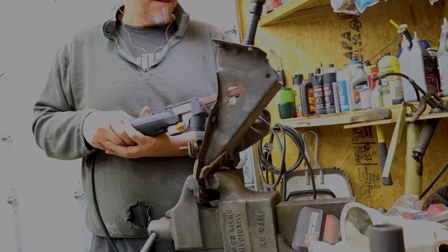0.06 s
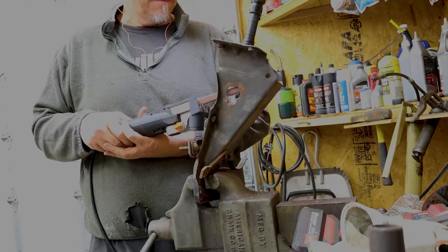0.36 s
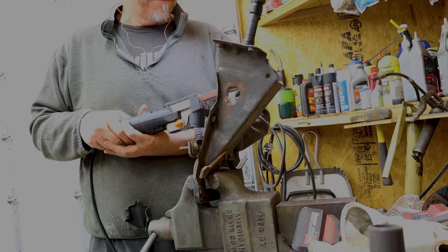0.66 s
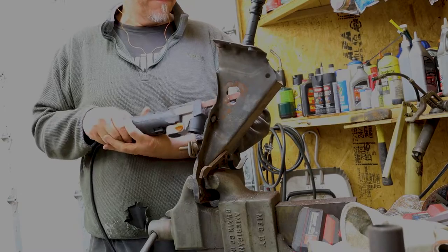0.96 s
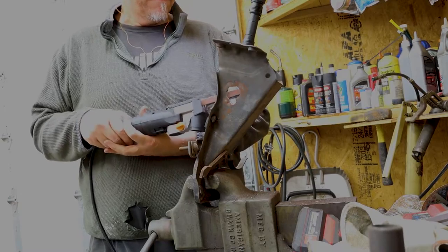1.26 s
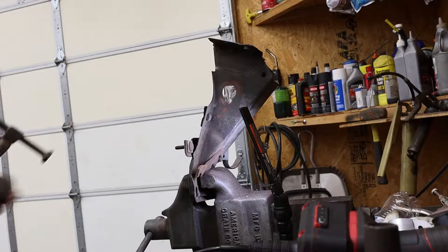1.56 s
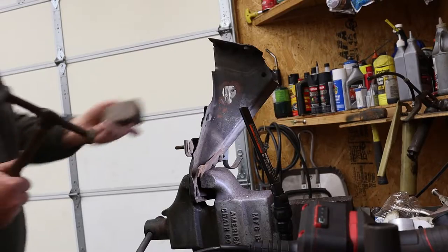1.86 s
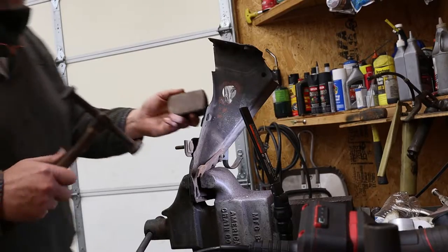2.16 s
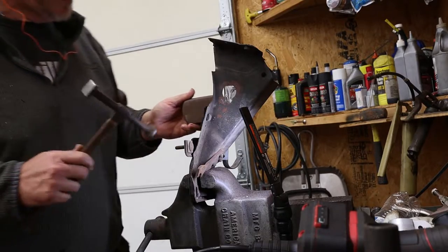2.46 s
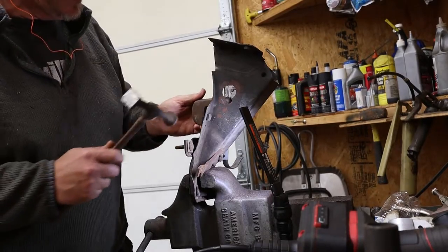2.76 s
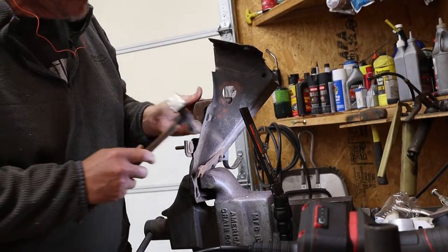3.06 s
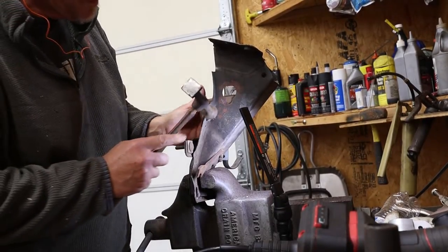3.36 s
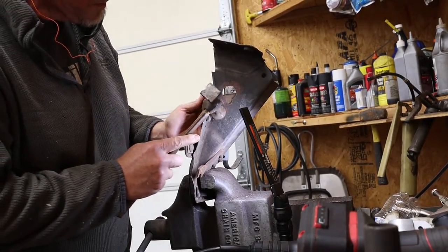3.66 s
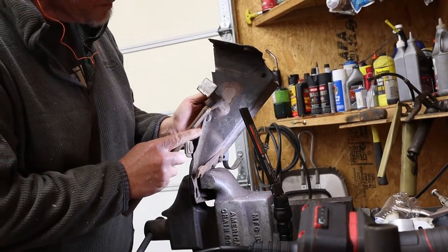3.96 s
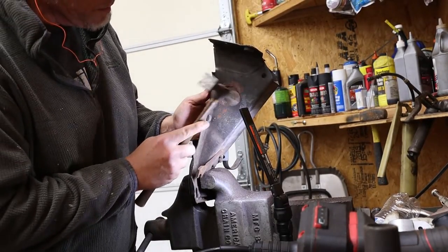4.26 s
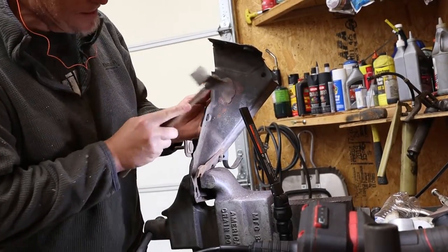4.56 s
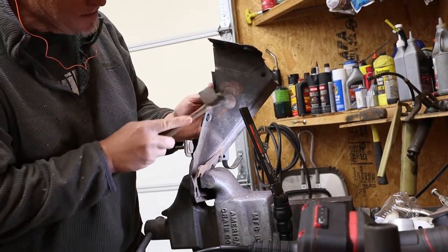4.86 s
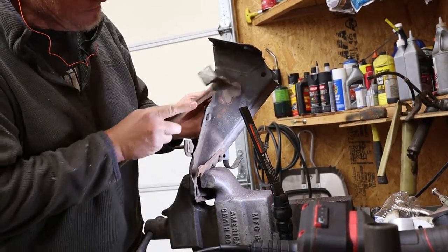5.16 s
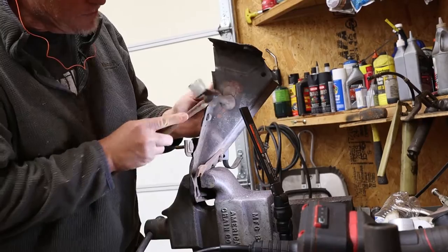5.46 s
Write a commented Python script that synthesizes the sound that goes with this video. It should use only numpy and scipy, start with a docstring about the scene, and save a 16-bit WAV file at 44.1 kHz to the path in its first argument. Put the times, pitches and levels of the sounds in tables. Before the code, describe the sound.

A high grinder whine with uneven, gritty rasps and thin squeals on steel is heard close by in a small workshop. After a sudden cut, sleeves rustle and a steel block and hammer clank several times against a bracket held in a vice, with a short slide of metal on metal. A firm hammer strike leads straight into a rapid stream of tiny, high metallic taps, like hammering played at high speed.

```python
"""Grinding and hammering a steel bracket.

In a workshop a small handheld grinder whines, and its grit rasps and squeals on the weld of a bracket
clamped in a vice. Abruptly the scene changes: a steel block is set against the bracket, and a hammer
is lined up and strikes once, exciting the plate modes. The hammering then runs on at six times its
speed, so that the same bracket and room sound as bright, quick ticks."""
import sys
import numpy as np
from scipy import signal
from scipy.fft import rfft, irfft, next_fast_len
from scipy.io import wavfile

SR = 44100
rng = np.random.default_rng(int(sys.argv[2]) if len(sys.argv) > 2 else 0)


def dump(signal):
    """Clip the signal to [-1, 1] and save it as 16-bit WAV at the path in sys.argv[1]."""
    limited = np.clip(np.atleast_2d(signal).T, -1, 1)
    pcm = np.round(limited * 32767).astype(np.int16)
    wavfile.write(sys.argv[1], SR, pcm)


N = 247842
TIME = np.arange(N) / SR
GRIND_END_S, FAST_START_S, FAST_SPEED = 1.56, 4.363, 6.0

# bending modes of the bracket: f/Hz, level/dB, T60/s
PLATE_MODES = [(340, -19, .3), (378, -19, .3), (505, -11, .17), (550, -11, .2), (790, -5, .15),
               (868, -1, .2), (962, -2, .15), (1030, -6, .13), (1105, -5, .18), (1250, -7, .18),
               (1515, -1, .15), (1567, -4, .17), (1845, 2.5, .17), (1980, -3, .12), (2033, 4, .17),
               (2190, -8, .12), (2320, -9, .16), (2460, -7, .14), (2640, -7, .14), (3060, -11, .13),
               (3420, -13, .13), (3665, -13, .12), (4038, -8, .13), (4380, -14, .11), (6400, -10, .08),
               (7420, -8, .1)]
# modes of bracket and vice swaying as one: f/Hz, level/dB, T60/s
SWAY_MODES = [(35, -27, 1.8), (38, -23, 1.9), (126, -20, .45), (136, -16, .4)]
# impacts of block and hammer: t/s, level/dB, hardness/dB, clatter/dB, T60 factor, sway/dB, favoured f/Hz
IMPACTS = [(1.652, -54, -9, 3, .66, -55, 2000), (2.391, -52.5, 3.5, -2, 0.58, -61, 2000),
           (2.508, -29.5, -2.5, -5.5, 1.27, -27.5, 1140), (2.569, -34, -4.5, -1, 0.41, -23, 1110),
           (3.2453, -30.5, -0.5, 0.5, 0.88, -18.5, 813), (3.875, -28, 2.5, -8, 1.28, -24.5, 2090),
           (4.3266, -20, 9, -3.5, 0.59, -18, 1945)]


def undb(db):
    """Decibels to amplitude ratio."""
    return 10 ** (np.asarray(db) / 20)


def unit(x):
    """Normalise to rms 1."""
    return x / np.sqrt(np.mean(x ** 2) + 1e-18)


def decay(t, t60):
    """Exponential decay by 60 dB in t60."""
    return np.exp(-np.log(1000) * t / t60)


def noise(size=N):
    """Gaussian white noise."""
    return rng.standard_normal(size)


def walk(rate_hz):
    """Interpolated random fluctuation of rms 1."""
    steps = noise(8192)
    return unit(np.interp(TIME * rate_hz, np.arange(len(steps)), steps))


def between(start, end):
    """A gate with 2 ms edges."""
    return np.interp(TIME, [start - .002, start, end, end + .002], [0, 1, 1, 0])


def strokes(rows, attack_s, release_s):
    """Power sum of envelopes that rise, hold and decay; rows are t/s, duration/s, level/dB."""
    power = 0
    for s, length, db in rows:
        early, late = np.maximum(s - TIME, 0), np.maximum(TIME - s - length, 0)
        power = power + (undb(db) * np.exp(-early / attack_s - late / release_s)) ** 2
    return np.sqrt(power)


def filtered(x, response):
    """Multiply the spectrum by a frequency response; rms 1."""
    size = next_fast_len(len(x) + 4096)
    hz = np.maximum(np.arange(size // 2 + 1) * SR / size, 1)
    return unit(irfft(rfft(x, size) * response(hz), size)[:len(x)])


def colour(x, points, speed=1):
    """Impose a spectral envelope, its frequencies scaled by speed."""
    hz, db = np.transpose(points)
    return filtered(x, lambda f: undb(np.interp(np.log(f / speed), np.log(hz), db)))


def resonate(x, modes):
    """Forced response of parallel resonators; modes are f/Hz, bandwidth/Hz, level/dB."""
    return filtered(x, lambda f: sum(undb(db) / (1 + 1j * (f * f - hz * hz) / (f * width))
                                     for hz, width, db in modes))


def below(x, hz):
    """Zero-phase low-pass filter."""
    return signal.sosfiltfilt(signal.butter(4, hz, fs=SR, output="sos"), x, padtype=None)


def add(out, s, x):
    """Superpose x on out from time s."""
    start = int(s * SR)
    out[start:start + len(x)] += x[:max(N - start, 0)]


def workshop(x, wet_db, t60):
    """Reverberation: diffuse reflections from bench and walls follow the direct sound."""
    t = TIME[:SR // 2]
    tail = noise(len(t)) * decay(t, t60) * (t > .004)
    return x + undb(wet_db) * signal.fftconvolve(x, tail / np.linalg.norm(tail))[:N]


def spindle():
    """Judder: dragged to a low speed, the spindle runs unevenly. Returns turns and judder (0 to 1)."""
    # rotation rate: t/s, f/Hz
    rotation = [(0.0, 327.0), (0.06, 339.1), (0.146, 325.6), (0.364, 317.0), (0.52, 320.4), (0.576, 328.7),
                (0.786, 318.6), (0.85, 340.6), (0.928, 330.8), (1.012, 343.6), (1.56, 326.3)]
    judder_hz, transition_hz = 320.6, 4.2
    speed_hz = np.interp(TIME, *np.transpose(rotation))
    judder = 1 / (1 + np.exp((speed_hz - judder_hz) / transition_hz))
    turns = np.cumsum(speed_hz * (1 + .016 * judder * walk(260))) / SR
    return turns, judder


def drive_whine(turns, judder):
    """Rotational orders: tones locked to the spindle speed, the high ones broken up by judder."""
    # tones of the drive: multiple of the rotation rate, level/dB
    orders = [(.69, -24), (1, -5), (1.72, -13), (3.1, -15), (3.76, -10.5), (5.45, -16.5), (9, 8)]
    # brief dips of the whine: t/s, duration/s, depth/dB
    dips = [(0.487, 0.02, 10), (1.018, 0.065, 26), (1.412, 0.019, 2)]
    breakup_db = judder * 11 * np.minimum(np.abs(walk(45)), 1.6) ** 2
    tones = sum(undb(db - breakup_db * (order / orders[-1][0]) ** 2) * np.sin(2 * np.pi * order * turns)
                for order, db in orders)
    dip_db = sum(db * np.exp(-(2 * (TIME - s) / length) ** 2) for s, length, db in dips)
    return unit(tones) * undb(-42.5 - dip_db)


def rushing_air():
    """Flow noise: air rushing through the housing hisses and excites its resonances."""
    # spectrum of the flow: f/Hz, level/dB
    spectrum = [(30, -19), (170, -29), (230, -27), (310, -5), (410, -13), (800, -9), (1200, -11.5),
                (2100, -14.5), (2900, -5), (3700, -20), (4200, -0.5), (6100, -5.5), (8200, -0.5), (9400, 9),
                (15800, 0.5)]
    # housing resonances: f/Hz, bandwidth/Hz, level/dB
    housing_modes = [(310, 45, -4), (540, 11, -9.5), (1002, 19, -0.5), (1170, 62, 5.5), (1656, 40, 1.5)]
    hiss = undb(-32.5 + .62 * walk(26)) * colour(noise(), spectrum)
    return hiss + undb(-50 + 3.5 * walk(13.03)) * resonate(noise(), housing_modes)


def draught():
    """Wind noise: the tool's draught arrives as puffs of pressure fluctuation near 72 Hz."""
    # puffs of air: t/s, duration/s, level/dB
    puffs = [(.01, 0.11, -59), (.32, 0.075, -60.5), (.63, 0.033, -62), (.76, 0.063, -53.5),
             (.89, 0.05, -66.5)]
    rumble = filtered(noise(), lambda f: 1 / (1 + (np.log(f / 72) / .2) ** 4))
    return strokes(puffs, attack_s=.015, release_s=.035) * rumble


def grit_rasp(chatter):
    """Abrasion: grains of unequal size tear at the steel, giving broadband noise and ringing."""
    # spectrum of the abrasion: f/Hz, level/dB
    spectrum = [(500, -18), (2000, -34), (3500, -77), (4500, 12), (6500, 15), (8300, 14), (10000, 15.5),
                (13000, 20), (15800, 0)]
    # resonances rung by the grit: f/Hz, bandwidth/Hz, level/dB
    modes = [(4200, 130, -9), (5180, 110, -5), (6150, 220, -1), (6950, 70, -11), (7480, 140, -5),
             (9085, 60, -2), (9600, 300, -6), (9895, 70, -2), (11100, 140, -5), (11680, 140, -5),
             (12350, 140, -6), (13900, 100, -5), (14650, 120, -2), (15020, 180, -3)]
    grit = noise() * undb(5 * noise()) * chatter
    return undb(-8) * colour(grit, spectrum) + undb(-6) * resonate(noise() * chatter, modes)


def steel_squeal(chatter):
    """Resonance: friction noise drives narrow, high modes of the steel."""
    # squealing modes: f/Hz, bandwidth/Hz, level/dB
    modes = [(6030, 26, -10), (6105, 30, 0), (6246, 36, -5), (9480, 200, -16), (9780, 160, -14),
             (14580, 35, -12), (14667, 35, -8), (15015, 90, -11)]
    return resonate(noise() * chatter, modes)


def grinder():
    """Amplitude modulation: contact with the weld swells rasp and squeal over the whine and air."""
    # the abrasive touches the weld: t/s, duration/s, rasp level/dB, squeal level/dB
    touches = [(0.057, 0.056, -20.5, -27), (0.121, 0.023, -21.5, -20), (0.221, 0.021, -23, -29),
               (0.259, 0.022, -21, -28.5), (0.289, 0.15, -22.5, -29.5), (0.449, 0.028, -21, -23.5),
               (0.52, 0.031, -23, -27.5), (0.571, 0.0092, -18.5, -21), (0.606, 0.01, -28, -33),
               (0.651, 0.0058, -19.5, -21.5), (0.69, 0.0085, -24, -20.5), (0.728, 0.037, -17.5, -26),
               (0.831, 0.0089, -31, -28.5), (0.864, 0.051, -20, -26.5), (1.039, 0.022, -23, -27),
               (1.222, 0.014, -27, -31), (1.299, 0.009, -27, -31), (1.367, 0.052, -29, -29),
               (1.434, 0.18, -25, -23)]
    rasp_gain = strokes([(s, span, db) for s, span, db, _ in touches], attack_s=.012, release_s=.006)
    squeal_gain = strokes([(s, span, db) for s, span, _, db in touches], attack_s=.0081, release_s=.013)
    skim_db = 2.6 * walk(30.7)  # between touches the abrasive only skims the steel
    turns, judder = spindle()
    whine = workshop(drive_whine(turns, judder), wet_db=-11.5, t60=.35)
    air = rushing_air()
    # the tool chatters in the hand and presses harder once a turn
    chatter = undb(2.4 * walk(170)) * (1 + .218 * np.sin(2 * np.pi * turns))
    rasp = np.hypot(rasp_gain, undb(-32 + skim_db)) * grit_rasp(chatter)
    squeal = np.hypot(squeal_gain, undb(-45 + skim_db)) * steel_squeal(chatter)
    return whine + draught() + workshop(air + rasp + squeal, wet_db=-9.5, t60=.077)


def room_tone():
    """Ambient noise: a low background whose level wavers slightly."""
    # spectrum of the background: f/Hz, level/dB
    spectrum = [(15, -71), (25, -59), (80, -9), (170, -0.5), (235, -1), (333, -1), (542, -5), (834, -9.5),
                (1040, -7.5), (1550, -10), (1820, -16), (2330, -11.5), (7030, -29.5), (15800, -39)]
    return undb(-48 + .64 * walk(8.1)) * colour(noise(), spectrum)


def blow(bands_db, edges_hz, ring, room_db, spot_hz, speed=1, crack_db=1, wash_db=1, detune=.0068):
    """Impulse response of the plate: a crack, damped modes, a wash of weaker modes and the room."""
    # spectrum of crack and wash: f/Hz, level/dB
    clang = [(12, -21), (40, -16), (130, -8), (200, -17.5), (300, -21), (520, -17), (1000, -3.5),
             (2100, -1.5), (3200, -7.5), (5000, -16.5), (7500, -14), (10000, -25), (15800, -33)]
    t = np.arange(int(SR / speed)) / SR * speed
    # each blow lands on another spot, and the block behind loads the plate a little differently
    plate = 0
    for hz, db, t60 in PLATE_MODES:
        level, pitch, phase = noise(3)
        spot_db = 7 * np.exp(-(np.log(hz / spot_hz) / .07) ** 2)  # the struck spot favours some modes
        if hz * speed < SR / 2:
            mode = np.sin(2 * np.pi * hz * (1 + detune * pitch) * t + np.pi * phase)
            plate += undb(db + spot_db + 2 * level) * decay(t, t60 * ring) * mode
    plate /= np.sqrt(np.mean(plate[t < .03] ** 2))
    clatter_gain = undb(wash_db) * decay(t, .18 * ring) + undb(crack_db) * decay(t, .05)
    direct = plate + clatter_gain * colour(noise(len(t)), clang, speed)
    # the room keeps the colour of the blow, blurred
    diffuse = unit(signal.fftconvolve(noise(len(t)), direct[t < .025], "same"))
    room = diffuse * decay(t, .71) * (1 - decay(t, .053))
    rest, out = direct + undb(room_db) * room, 0
    # thud, body, clink and crack: each band's level is set over its first 30 ms
    for hz, db in zip([*edges_hz, None], bands_db):
        band = rest if hz is None else below(rest, hz)
        rest = rest - band
        out += undb(db) * band / np.sqrt(np.mean(band[:int(.03 * SR)] ** 2))
    return out


def sway(speed=1):
    """Free vibration: the bracket and vice rock in their low, damped modes."""
    t = np.arange(int(2 * SR / speed)) / SR * speed
    return sum(undb(db) * decay(t, t60) * np.sin(2 * np.pi * hz * t) for hz, db, t60 in SWAY_MODES)


def knocks():
    """Impact excitation by block and hammer: the harder the contact, the stronger the high bands."""
    # thud, body, clink and crack at middling hardness: level/dB
    balance_db = [-5.5, 1, -4.5, -14.5]
    out = np.zeros(N)
    for s, db, hardness_db, clatter_db, ring, sway_db, spot_hz in IMPACTS:
        bands_db = db + np.array(balance_db) + hardness_db * np.array([0, 0, 1, 2])
        knock = blow(bands_db, edges_hz=[700, 1700, 3200], ring=ring, room_db=-13, spot_hz=spot_hz,
                     crack_db=clatter_db - 4, wash_db=clatter_db + 3)
        onset = 1 - np.exp(-TIME[:len(knock)] / .0012)  # the plate takes a moment to reach full swing
        add(out, s, knock * onset)
        add(out, s, undb(sway_db) * sway())
    return out


def shuffling():
    """Friction noise: feet and sleeves rustle in short bursts."""
    # movements: t/s, duration/s, level/dB
    shuffles = [(1.655, 0.036, -39.5), (2.24, 0.02, -48), (2.41, 0.14, -49), (2.575, 0.049, -46)]
    # spectrum of the rustle: f/Hz, level/dB
    spectrum = [(100, -44), (300, 2.5), (1800, 7.5), (4000, 2), (8000, -8), (15000, -24)]
    gain = strokes(shuffles, attack_s=.022, release_s=.093) * undb(1.1 * walk(60))
    return gain * colour(noise(), spectrum)


def sliding_block():
    """Sliding friction: the block drives and damps the plate modes, and rocks the bracket in the vice."""
    # steel slides on steel: t/s, duration/s, level/dB
    slides = [(2.8, .1, -60), (3.36, 0.13, -46), (3.7, 0.07, -49), (3.772, 0.032, -34.5),
              (3.828, 0.098, -31.5)]
    # spectrum of the scrape: f/Hz, level/dB
    spectrum = [(200, -13), (900, -14), (2200, -8), (3200, -17), (4200, -23.5), (6000, -16), (15000, -41.5)]
    slips = noise() * undb(2.1 * walk(400))
    damped_modes = [(hz, 5 * np.log(1000) / (np.pi * t60), db) for hz, db, t60 in PLATE_MODES]
    scrape = undb(-13.5) * colour(slips, spectrum) + undb(-7.5) * resonate(slips, damped_modes)
    rocking = undb(-9) * resonate(noise(), [(hz, np.log(1000) / t60, db) for hz, db, t60 in SWAY_MODES])
    return strokes(slides, attack_s=.019, release_s=.012) * (scrape + rocking)


def fast_hammering():
    """Time scaling: at six times the speed, every mode is six times higher and shorter."""
    # spectrum of the background: f/Hz, level/dB
    background = [(30, -24), (110, 3.5), (180, 11.5), (260, -5.5), (800, -2.5), (2000, -9), (4000, -22),
                  (8000, -5.5), (15800, -29)]
    # quick blows: t/s, level/dB, extra body of a square hit/dB
    taps = [(4.4022, -23, -2), (4.4618, -24, -1), (4.5197, -24.5, -3.5), (4.5775, -21.5, 3),
            (4.641, -22.0, 3.5), (4.7019, -23.0, 3.5), (4.7643, -23, 1), (4.8254, -26, -0.5),
            (4.8874, -29, -0.5), (4.952, -26.5, 0.5), (5.0149, -28, 1.5), (5.0755, -29.5, 0.5),
            (5.1376, -29.5, 0.0), (5.196, -28.5, -3.0), (5.2572, -28.0, -5), (5.3151, -28, 0.5),
            (5.3808, -27.5, -3), (5.4419, -27.5, -0.5), (5.4969, -28.5, -0.5), (5.5557, -27.5, 0.0),
            (5.611, -30.5, 3)]
    # how strongly room and vice ring on: t/s, level/dB
    ring_on = [(4.4, 6), (4.75, -1), (4.95, -4.5), (5.6, -10.5)]
    edges_hz = [1500, 4200, 9500]
    out = undb(-56) * colour(noise(), background)
    # the first full blow is still ringing when the speed jumps
    blow_s, *_, spot_hz = IMPACTS[-1]
    struck_s = FAST_START_S - (FAST_START_S - blow_s) / FAST_SPEED
    add(out, struck_s, blow([-19, -22.5, -21, -28], edges_hz, ring=.48, room_db=-15,
                            spot_hz=spot_hz, speed=FAST_SPEED))
    add(out, struck_s, undb(-13) * sway(FAST_SPEED))
    # one low plate mode hums on from blow to blow
    t = TIME[:SR // 2] * FAST_SPEED
    hum = undb(-54.5) * decay(t, .79) * np.sin(2 * np.pi * 336 * t)
    for s, db, body_db in taps:
        ring_on_db = np.interp(s, *np.transpose(ring_on))
        bands_db = db + np.array([-18.5, -12.5 + body_db, -2.96, 1.1])
        add(out, s, blow(bands_db, edges_hz, ring=1, room_db=ring_on_db, spot_hz=1110,
                         speed=FAST_SPEED, crack_db=1.5, wash_db=3, detune=.0073))
        add(out, s, undb(ring_on_db - 30) * sway(FAST_SPEED))
        add(out, s, hum)
    return out


def scene():
    """Gating: grinding, lining up and fast hammering follow one another abruptly, in mono."""
    out = grinder() * between(0, GRIND_END_S)
    lining_up = room_tone() + shuffling() + sliding_block() + knocks()
    out += lining_up * between(GRIND_END_S, FAST_START_S)
    out += fast_hammering() * between(FAST_START_S, N / SR)
    return out[None]


def record(dry):
    """Clipping and band limiting: peaks flatten at full scale, and the treble ends at 15.9 kHz."""
    low_pass = signal.ellip(8, .2, 70, 15900, fs=SR, output="sos")
    return signal.sosfilt(low_pass, np.clip(dry, -1, 1))


dry = scene()
out = record(dry)
dump(out)
```